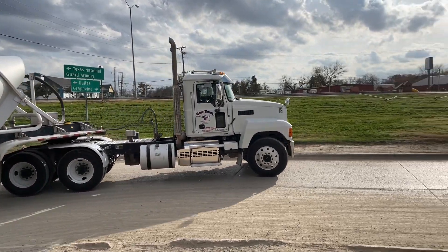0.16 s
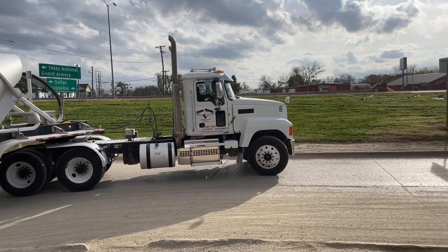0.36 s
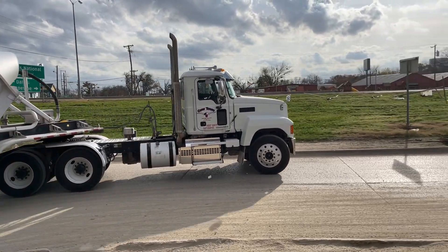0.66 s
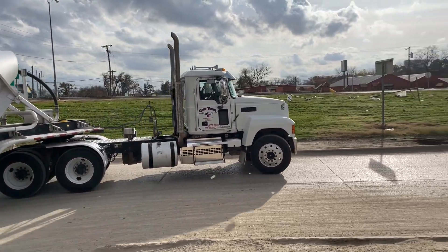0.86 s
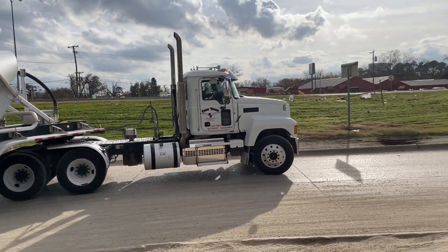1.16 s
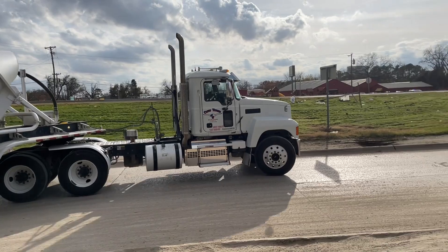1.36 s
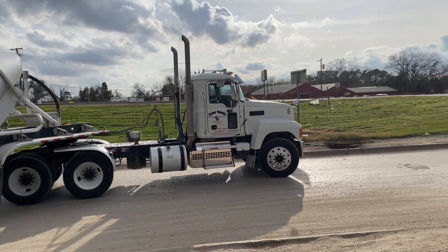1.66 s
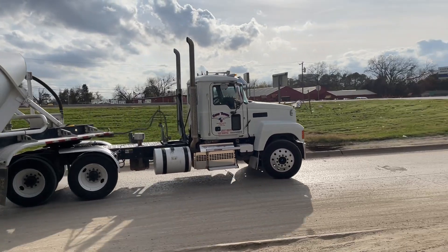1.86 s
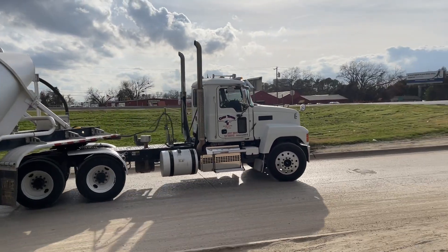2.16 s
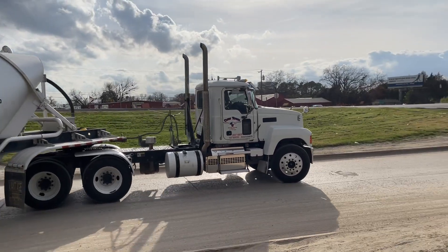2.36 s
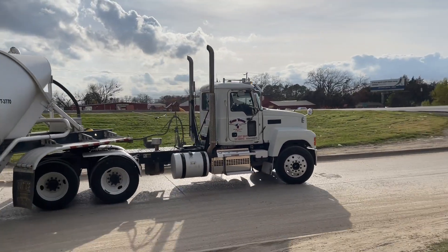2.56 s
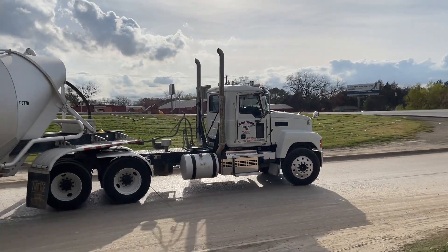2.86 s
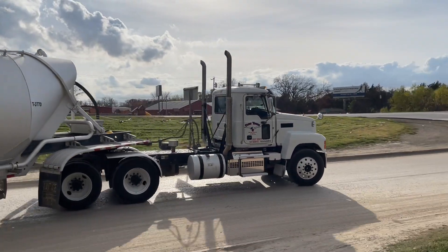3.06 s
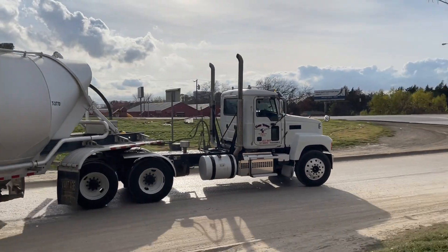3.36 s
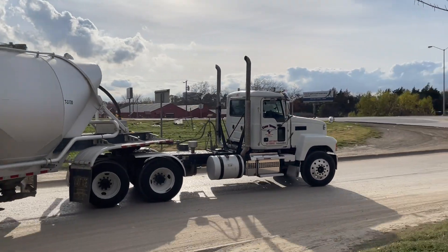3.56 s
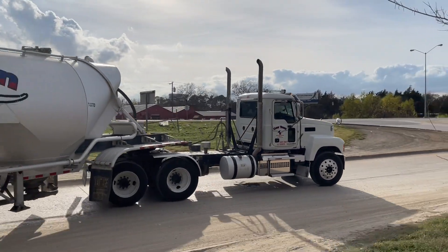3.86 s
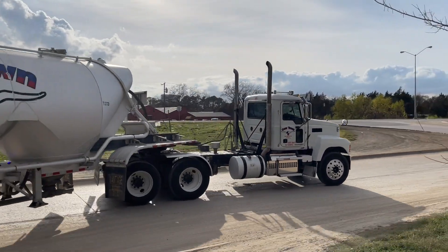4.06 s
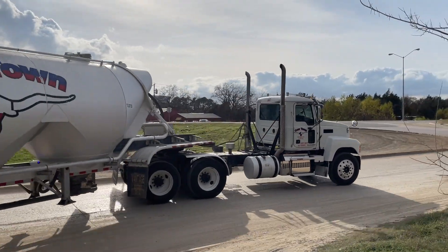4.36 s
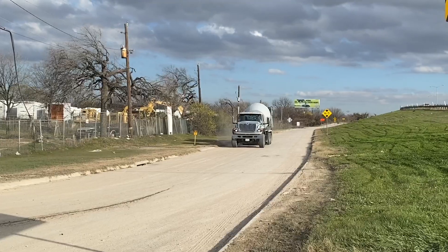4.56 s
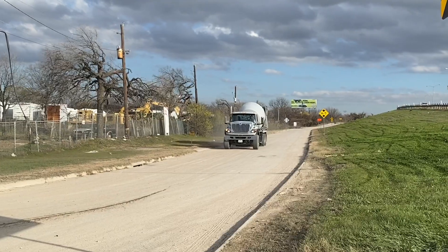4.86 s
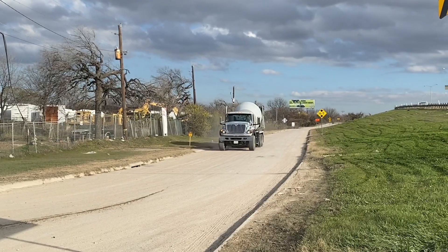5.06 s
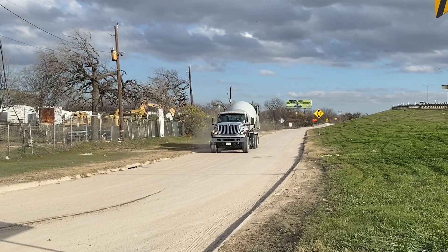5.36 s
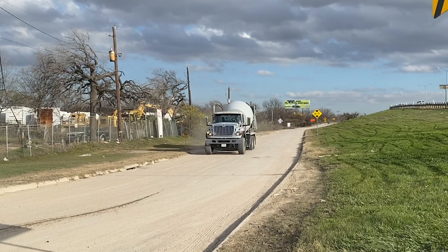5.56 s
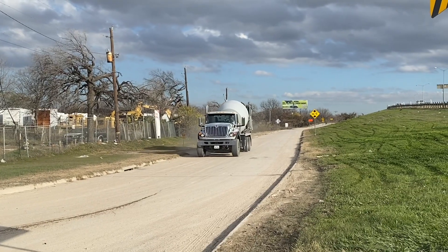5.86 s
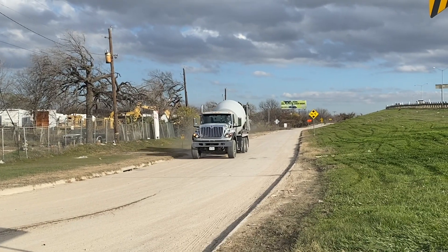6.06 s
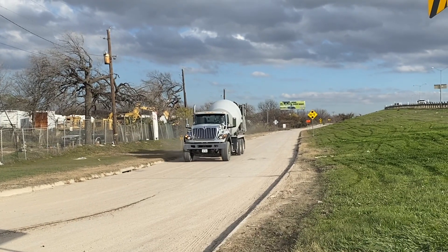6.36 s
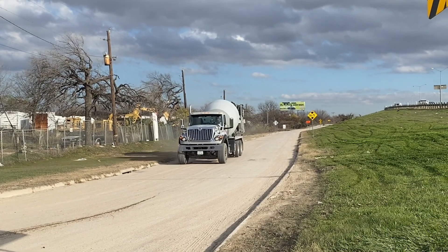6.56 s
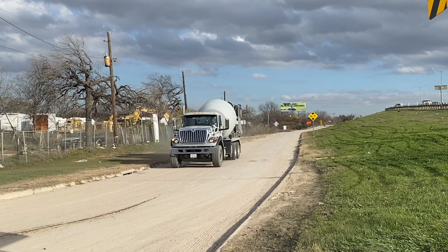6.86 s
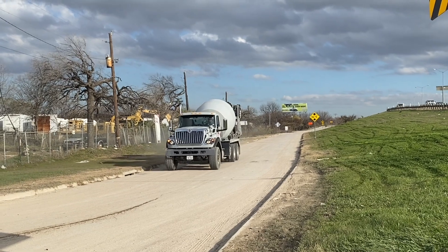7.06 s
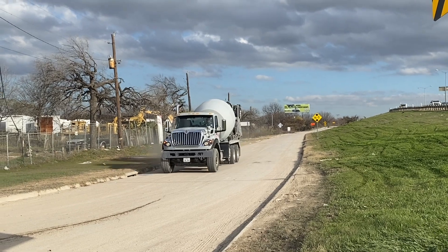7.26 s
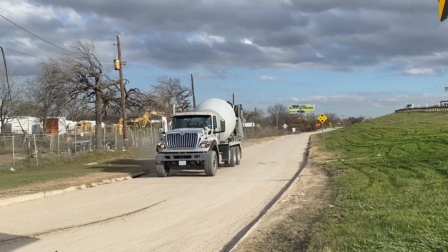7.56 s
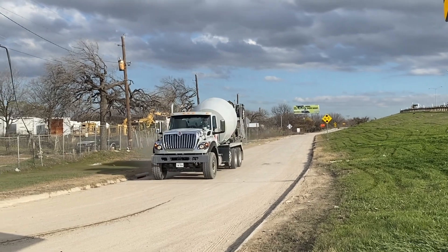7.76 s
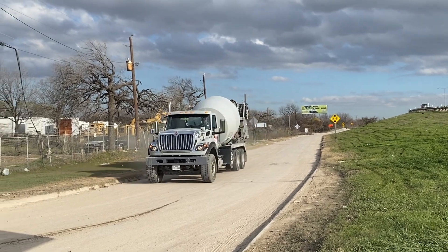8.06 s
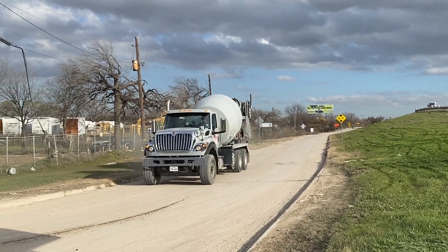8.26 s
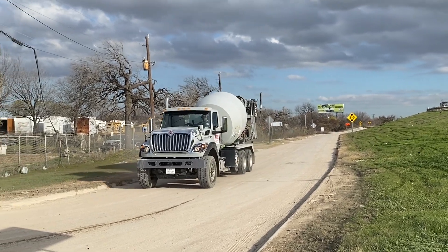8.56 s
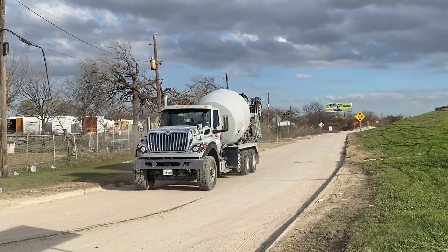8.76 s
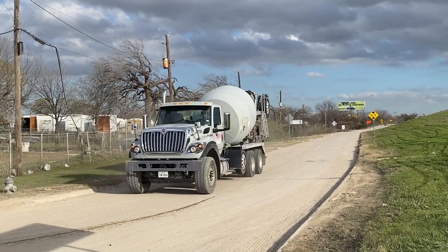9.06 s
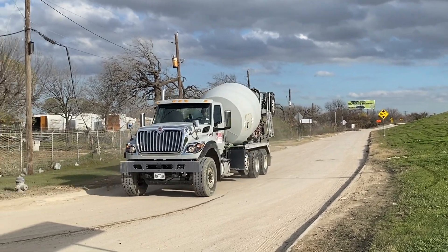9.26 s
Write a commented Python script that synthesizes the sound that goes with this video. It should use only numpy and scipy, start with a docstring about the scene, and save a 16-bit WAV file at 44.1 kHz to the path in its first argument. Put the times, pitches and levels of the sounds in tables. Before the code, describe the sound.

A heavy diesel truck rolls past close to a stereo microphone at low revs, with a throbbing exhaust, engine clatter, a brief air brake hiss and rapid squeaking. As it fades, its trailer coupling clanks twice and wind buffets the microphone. After a sudden dip, a second truck rumbles in from far down a quiet road and sounds two long air horn blasts with a faint echo.

```python
"""Two trucks and an air horn

A heavy diesel rolls past close to a stereo microphone, at low revs in gusty wind: exhaust tones on the
firing rate, block clatter, a squeaking shaft, a brake valve. After a short fade we stand by a quiet
road, where a second truck approaches from afar and sounds its air horn twice, a diaphragm beating into
a trumpet. At each blast the loudness of everything sinks in sudden steps; in between it creeps back."""
import sys
import numpy as np
from scipy import signal
from scipy.fft import rfft, irfft
from scipy.io import wavfile
from scipy.ndimage import uniform_filter1d, map_coordinates

SR = 44100
rng = np.random.default_rng(int(sys.argv[2]) if len(sys.argv) > 2 else 0)


def master_out(mix):
    """Clip the mix to full scale and print it as 16-bit PCM to the path in sys.argv[1]."""
    frames = np.transpose(np.atleast_2d(mix))
    ceiling = np.clip(frames, -1, 1)
    pcm = np.round(ceiling * 32767).astype(np.int16)
    wavfile.write(sys.argv[1], SR, pcm)


N = 414981

# The diesel, close by. Each row: time in seconds, firing rate in Hz, then firing tone, gear whine and
# relative body noise in dB.
NEAR_ENGINE = [(0.0, 52.5, -25.5, -42, 2), (0.61, 55.06, -25.5, -53, 0.5), (1.0, 53.2, -25.5, -44, -0.8),
               (1.4, 55.02, -25, -47, 1), (1.85, 53.52, -25.5, -43, 2), (2.4, 53.03, -26.5, -39.5, 0),
               (2.9, 52.54, -31.5, -44, -2.5), (3.63, 51.77, -30, -51, -4.5),
               (4.43, 51.6, -35.5, -45, -6.5)]
# Further exhaust tones. Each row: multiple of the firing rate, level in dB over the firing tone.
EXHAUST_TONES = [(2, -15), (3.5, -8), (4, -16), (5.5, -15), (8.5, -14), (11.5, -17), (13.5, -15), (15, -16),
                 (16, -16)]
# Rumble, block clatter, fan and tyre hiss. Each row: level in dB at the loudest, share of the fading.
NEAR_BANDS = [(-24.5, 0.08), (-19, 0.36), (-32.5, 0.73)]
# Colour of the body noise. Each row: frequency in Hz, relative level in dB.
NEAR_COLOUR = [(18, -35), (30, -17.5), (58, -11), (81, 7), (283, -8), (321, -14.5), (374, -13.5),
               (459, -16), (1060, -17), (1340, -19), (1770, -23), (5170, -24.5), (7980, -41.5),
               (10300, -31.5), (13300, -49.5)]
# Its stereo width. Each row: frequency in Hz, side over mid in dB.
NEAR_WIDTH = [(60, -29), (190, -15.5), (600, -11.5), (1250, -13.5), (1720, 0.5), (2200, -9), (3200, -4.5),
              (5000, -9.5), (6400, -1.5), (7800, 13), (10200, -13), (12800, 5.5)]
# Body resonances. Each row: centre in Hz, width in Hz, lift in dB.
NEAR_RESONANCES = [(637, 94, 3.5), (2140, 580, 5.5), (477, 24, 3.5), (1800, 66, -7.5), (1386, 81, 4.5),
                   (118, 30, -4.5), (4290, 260, 3.5), (5250, 400, 3.5)]
def near_truck(t, pipe_hz=328, pipe_width_hz=11.4, whine_multiple=46.7):
    """Close by: exhaust and gear tones ride on the firing rate, and the body noise throbs with it."""
    firing_hz, tone_db, whine_db, body_db = curves(NEAR_ENGINE, t)
    firings = np.cumsum(firing_hz) / SR
    # An exhaust resonance lifts the sixth multiple at higher revs.
    detuning = 2 * (6 * firing_hz - pipe_hz) / pipe_width_hz
    sixth_db = tone_db - 4 - 10 * np.log10(1 + detuning ** 2)
    orders = [(1, tone_db), (6, sixth_db), (whine_multiple, whine_db)]
    orders += [(k, tone_db + db) for k, db in EXHAUST_TONES]
    tones = sum(gain_of(db + .7 * wander(t, 8)) * np.sin(2 * np.pi * (k * firings + rng.random()))
                for k, db in orders)
    throb = 1 + .035 * np.cos(np.pi * firings) + .069 * np.cos(2 * np.pi * firings)
    body = roar(t, body_db, NEAR_BANDS, NEAR_COLOUR, NEAR_WIDTH, NEAR_RESONANCES,
                low_hz=380, high_hz=2340, patchy_db=.6, flicker_db=.49)
    return np.sqrt(2) * tones + throb * body


# Two blasts, a list each, valve opening to silence. Each row: time in seconds, air pressure in dB re full.
HORN_BLASTS = [
    [(6.667, -9.5), (6.69, -7), (6.87, -3.5), (7.02, -5.5), (7.16, -1), (7.4, 0), (7.56, -1.5), (7.78, -9),
     (7.9, -12.5), (7.98, -17), (8.07, -26)],
    [(8.639, -6.5), (8.68, -3.5), (8.83, 0), (9.01, -2.5), (9.17, 1), (9.39, -4), (9.6, -12.5)],
]
# Rattle of the horn mount. Each row: time in seconds, rate in Hz.
MOUNT_RATTLE = [(6.7, 72.4), (7.43, 70.4), (7.8, 65.5), (8.68, 58.1), (9.4, 57)]
def air_horn(blast, horn_hz=415.6, sharpen_hz_per_db=.36, buzz_hz=91):
    """Down the road, a diaphragm beats into a trumpet: 30 partials, a rattle on them, escaping air."""
    rows = HORN_BLASTS[blast]
    opens, silent = rows[0][0], rows[-1][0]
    t = np.arange(round(opens * SR), min(round(silent * SR), N)) / SR
    age = t - opens
    pressure_db = curves(rows, t)[0]
    # The pitch starts sharp, settles, and climbs as the pressure sags.
    hz = horn_hz + 14 * np.exp(-age / .005) - sharpen_hz_per_db * pressure_db
    cycles = np.cumsum(hz + .28 * wander(t, 40) + .3 * wander(t, 300)) / SR
    rattle = phase_of(curves(MOUNT_RATTLE, t)[0])
    out = np.zeros((2, len(t)))
    for n in range(1, 31):
        size = np.sqrt(2) * gain_of(partial_db(n, blast, t, age, pressure_db))
        depth = np.clip(.12 * (n - 5.5), .04, .42)  # high partials rattle most
        depth = depth * np.clip(.7 + .25 * wander(t, 6), 0, 1.2)
        shake = np.cos(rattle + 2 * np.pi * rng.random()) + (n > 10) * .36 * np.cos(2 * rattle)
        size *= 1 + depth * shake
        if 3 <= n <= 5:  # a second, fainter rattle
            size += gain_of(pressure_db - 40) * np.cos(2 * np.pi * buzz_hz * t)
        angle = 2 * np.pi * n * cycles - .04 * n ** 2 + depth / 2 * np.sin(rattle) + .2 * wander(t, 3)
        out += size * horn_at_ports(n, horn_hz * n, angle)
    out += escaping_air(pressure_db, cycles)
    valve = np.clip(np.minimum(age / .0058, (silent - t) / .022), 0, 1)
    whole = np.zeros((2, N))
    whole[:, round(opens * SR):][:, :len(t)] = out * valve
    return whole


# The horn's timbre. Each row: partial number, dB per dB of pressure, then for each blast the level at
# full pressure in dB, drift in dB per second and bend in dB per second squared.
HORN_PARTIALS = [(1, 0.33, -14, -5.5, 0, -13.5, 3.5, -14), (2, 1.13, -8.5, 4, -2, -5.5, 4.5, -6),
                 (3, 0.87, -7, -0.6, 0.3, -6.5, -2.5, -1), (4, 1.46, -10, -14, 6.5, -21.5, -2, 9),
                 (5, 0.25, -26, -7, 6, -22.5, 1, -8), (6, 0.59, -19, 2, -2.5, -18, -19, 4),
                 (7, 0.43, -28, -12, 15.5, -19, -4, -18), (8, 1.07, -28.5, 9, -3.5, -23.5, -14.5, 19),
                 (9, 0.21, -25, -10, 3, -31.5, 5, 4), (10, 0.15, -26.5, 4.5, -10, -26.5, 8, -15),
                 (11, 0.75, -28, -2, 3, -27.5, -2, -5), (12, -0.83, -38.3, -4, -4, -38.5, -3, 8.4),
                 (13, 1.1, -35, -2.5, 3, -41, 4, -1.1), (14, 0.55, -35.5, -14, 13, -35.1, 4, -8.0),
                 (15, 1, -43, 2, 5, -39, 3.4, 3.5), (16, 0.58, -36.5, 14, -23, -41, 2, -5),
                 (17, -0.091, -33, -8, -8, -44, 5, -10.0), (18, 0.14, -34, -10.5, 3, -35.5, -12.6, 9),
                 (19, 0.13, -38.5, -5, 0, -38, -3.4, -1.6), (20, 0.32, -54.5, 4.5, 7.5, -46.6, 5.0, -4.3),
                 (22, 0.8, -48, 4, -3, -47, 2, -4), (24, 0.18, -43.5, -11, 7, -47, 3, -0.0),
                 (30, 0.75, -61, -4, 0, -65, 2, 0)]
# Single partials drop out and return. Each row: partial number, time in seconds, dip in dB,
# half-length in seconds.
PARTIAL_DIPS = [(7, 6.99, -9, 0.084), (4, 7.04, -6, 0.027), (5, 7.0, -7, 0.031), (6, 9.09, -7, 0.055),
                (12, 7.17, -5, .08), (5, 7.62, -14, 0.084), (12, 8.88, -5, .06), (4, 8.95, -6, 0.1),
                (8, 9.06, -9, 0.097), (7, 9.32, -10, 0.046)]
# The second partial's lift at the onset, in dB for each blast; its neighbours move the other way.
ONSET_DB = [7, -1]
COLLAPSE_DB = -10  # under this pressure the partials die, the highest first
def partial_db(n, blast, t, age, pressure_db):
    """The level of one horn partial follows the air pressure, drifts and wavers."""
    numbers, *columns = np.transpose(HORN_PARTIALS)
    columns = [columns[0]] + columns[1 + 3 * blast:4 + 3 * blast]
    follow, full_db, drift, bend = (np.interp(n, np.rint(numbers), c) for c in columns)
    db = full_db + follow * pressure_db + (drift + bend * age) * age
    db += .48 * n * np.minimum(pressure_db - COLLAPSE_DB, 0)
    db += ONSET_DB[blast] * {1: -1, 2: 1, 3: -2, 4: -2}.get(n, 0) * np.exp(-(age / .012) ** 4)
    db += .5 * wander(t, 40) if n < 4 else 1.4 * wander(t, 7)
    return db + sum(dip * bump(t - s, length) for k, s, dip, length in PARTIAL_DIPS if round(k) == n)


# The horn's balance, left over right in dB, for partials 1 to 4 and then all the rest.
HORN_BALANCE_DB = [-0.8, 1, -1.5, -7.5, .7]
# The horn's bearing. Each row: frequency in Hz, lead of the left port in radians.
HORN_LEAD = [(400, 0.08), (2000, 0.25), (3000, 0.6), (4600, 0.55), (5800, 0.5), (7000, 2), (8500, 1.5),
             (10000, 1), (11200, 1), (12100, 2), (12600, -5)]
def horn_at_ports(n, hz, angle):
    """A partial reaches the two microphone ports at different levels and phases."""
    lean = gain_of(HORN_BALANCE_DB[min(n, len(HORN_BALANCE_DB)) - 1])
    lead = np.tan(np.clip(at_hz(HORN_LEAD, hz), -2.3, 2.3) / 2)
    side = (lean - 1) / (lean + 1) * np.cos(angle) - lead * np.sin(angle)
    return np.cos(angle) + np.array([side, -side])


# Colour of the horn's air. Each row: frequency in Hz, relative level in dB.
AIR_COLOUR = [(300, -20), (900, -2), (1500, -14), (3000, -7), (5000, -5), (7000, -5), (8500, -11),
              (11000, -18), (13000, -34)]
def escaping_air(pressure_db, cycles):
    """Air hisses out of the horn, pulsing with each cycle of the diaphragm."""
    noise = rng.standard_normal((3, len(cycles)))
    hiss = unit_rms(coloured(noise[0] + .5 * noise[1:], AIR_COLOUR))
    db = -37 + .5 * pressure_db + 2 * np.minimum(pressure_db - COLLAPSE_DB, 0)
    return hiss * gain_of(db) * (1 + .5 * np.cos(2 * np.pi * cycles))


# Returns from banks and sheds. Each row: frequency in Hz, level in dB relative to the horn.
ECHO_COLOUR = [(400, -17), (830, -18.5), (1250, -15.5), (1660, -11.5), (2080, -8), (2500, -14),
               (2900, -12.5), (4000, -9.5), (6000, -10), (9000, -10)]
# Walls the truck leaves behind return the tone flatter by these shares of its pitch.
WALL_FLATTENING = [.001, .008, .017, .024]
def echoes(horn, opens, t60=.77):
    """Faint returns of one blast from along the road, each wall with its own drop in pitch."""
    t, samples, out = np.arange(SR // 2) / SR, np.arange(N), np.zeros((2, N))
    mono = coloured(horn.mean(0), ECHO_COLOUR)
    for share in WALL_FLATTENING:
        taps = rng.standard_normal((2, len(t))) * (rng.random((2, len(t))) < .05)
        taps *= gain_of(-60 * t / t60) * (t > .03)
        slowed = map_coordinates(mono, [samples - share * (samples - opens * SR)], order=3)
        out += signal.fftconvolve(slowed[None], taps / np.linalg.norm(taps[0]), axes=1)[:, :N]
    return out / np.sqrt(len(WALL_FLATTENING))


# The second truck, far down the road. Each row: time in seconds, relative level in dB.
FAR_LEVEL = [(4.48, -2), (5.1, -1.5), (5.7, 0), (6.6, 1), (7.3, 0), (8.1, -2.5), (8.6, -0.5), (9.41, -7)]
# Rumble, tyre roar, hiss. Each row: level in dB at the loudest, share of the fading.
FAR_BANDS = [(-25, 0.65), (-30, 1.04), (-43.5, 1.47)]
# Its colour from afar. Each row: frequency in Hz, relative level in dB.
FAR_COLOUR = [(18, -41), (30, -15.5), (97, -4.5), (243, -14.5), (415, -16.5), (640, -14), (825, -15),
              (1090, -16), (1240, -19), (1520, -20), (7780, -44), (10300, -53), (13300, -81)]
# Its stereo width. Each row: frequency in Hz, side over mid in dB.
FAR_WIDTH = [(60, -29), (130, -12.5), (280, -14.5), (600, -9.5), (1290, -5), (2770, -10.5), (5970, -10.5),
             (12800, 5)]
# Body resonances. Each row: centre in Hz, width in Hz, lift in dB.
FAR_RESONANCES = [(97, 45, 3), (625, 70, 4.5), (705, 70, 4)]
def far_truck(t):
    """Rumble and tyre roar carry up the quiet road."""
    return roar(t, curves(FAR_LEVEL, t)[0], FAR_BANDS, FAR_COLOUR, FAR_WIDTH, FAR_RESONANCES,
                low_hz=300, high_hz=2500, patchy_db=1.1, flicker_db=.5)


# Balance of both trucks' noise at the microphone. Each row: frequency in Hz, left over right in dB.
MIC_BALANCE = [(60, -4), (230, -0.5), (880, 0), (3360, 2), (12800, -1)]
def roar(t, level_db, bands, colour, width, resonances, low_hz, high_hz, patchy_db, flicker_db):
    """Noise in a truck's body resonances; three bands follow one level, and patches drift through."""
    frames, hz = N // 256 + 5, np.fft.rfftfreq(1024, 1 / SR)
    frame_t = np.arange(frames) * 256 / SR
    mid_re, mid_im, side_re, side_im, patches = rng.standard_normal((frames, 513, 5)).T
    patches = unit_rms(uniform_filter1d(uniform_filter1d(patches, size=8, axis=0), size=12, axis=1))
    resonance_db = sum(db / (1 + (2 * (hz - f) / w) ** 2) for f, w, db in resonances)
    shape = gain_of(at_hz(colour, hz) + resonance_db)
    low, high = 1 / (1 + (hz / low_hz) ** 4), 1 / (1 + (high_hz / (hz + 1)) ** 4)
    regions = [shape * r for r in (low, np.clip(1 - low - high, 0, 1), high)]
    fading_db = np.interp(frame_t, t, level_db - level_db.max())
    field = sum(np.outer(r / np.linalg.norm(r), gain_of(db + share * fading_db))
                for r, (db, share) in zip(regions, bands))
    field *= gain_of(patchy_db * patches + flicker_db * wander(frame_t, 30))
    mid = mid_re + 1j * mid_im
    side = (side_re + 1j * side_im) * gain_of(at_hz(width, hz))[:, None]
    lean = gain_of(at_hz(MIC_BALANCE, hz) / 2)[:, None]
    stereo = field * np.array([(mid + side) * lean, (mid - side) / lean])
    return signal.istft(stereo, nperseg=1024, noverlap=768)[1][:, :N] / np.sqrt(2)


# A shaft on the near truck. Each row: time in seconds, turns so far, squeak pitch in Hz, level in dB.
SHAFT = [(.6, 5.6, 1335, -38), (1.1, 10.65, 1335, -30), (1.3, 12.69, 1335, -25), (1.5, 14.78, 1325, -28),
         (1.8, 17.81, 1300, -27), (2.35, 23.44, 1300, -26), (2.5, 24.99, 1372, -28),
         (3.3, 33.01, 1378, -29), (3.6, 35.95, 1378, -30), (4.2, 41.7, 1370, -35)]
def shaft_squeak(t, glide_hz_per_turn=60, chatter_lag_turns=.35):
    """A rising squeak once a turn, then a weaker one of changing size."""
    turns, hz, db = curves(SHAFT, t)
    offset = turns - np.rint(turns)
    chatter = .9 * np.clip(.5 + .5 * wander(t, 5.9), 0, 1) * bump(offset - chatter_lag_turns, .08)
    envelope = (.38 + bump(offset, .08) + chatter) * (t > SHAFT[0][0]) * (t < SHAFT[-1][0])
    pitch = hz + glide_hz_per_turn * offset + 40 * wander(t, 300)
    return envelope * gain_of(db + 2.1 * wander(t, 80)) * tone(pitch)


# The ring of a knock. Each row: frequency in Hz, level in dB, seconds to fall 60 dB.
KNOCK_RING = [(850, 0, .05), (915, -2, .04), (790, -4, .04)]
def shaft_knocks(t, loudest_s=3.0, spread_s=.45):
    """Dull knocks, twice a shaft turn, swell and fade as the near truck passes."""
    turns = curves(SHAFT, t)[0]
    strikes = np.diff(np.floor(2 * turns + .6), prepend=0) == 1
    db = -19 - 9 * ((t - loudest_s) / spread_s) ** 2 + 2 * rng.standard_normal(N)
    return struck(strikes * gain_of(db), KNOCK_RING, rise_s=.002)


# Blows and bounces of the trailer coupling. Each row: start in seconds, peak in dB.
COUPLING_BLOWS = [(4.169, -22), (4.177, -28), (4.184, -26), (4.281, -19.5), (4.286, -26)]
# The coupling's ring. Each row: frequency in Hz, level in dB, seconds to fall 60 dB.
COUPLING_RING = [(3300, 2, .018), (2988, -3, .02), (3700, -3, .012), (4500, -5, .01), (5760, -5, .012),
                 (6460, -9, .01)]
def coupling_clanks():
    """Close by, the trailer coupling strikes twice and bounces."""
    blows = np.zeros(N)
    for start, db in COUPLING_BLOWS:
        blows[round(start * SR)] = gain_of(db)
    return struck(blows, COUPLING_RING, rise_s=.0003)


def brake_vent(t, opens_s=.4, shuts_s=.85, db=-35.5):
    """A brake valve on the near truck lets off air in a swelling hiss and shuts at once."""
    swell = np.clip(np.minimum((t - opens_s) / (shuts_s - opens_s), (shuts_s - t) / .01), 0, 1)
    return gain_of(db) * np.sqrt(swell) * band_noise(2500, 3600, N)


# Whistles at both places. Each row: start and length in seconds, pitch in Hz, glide in Hz per second,
# level in dB, waver in Hz.
THIN_WHISTLES = [(.45, .36, 2640, -40, -41, 13), (4.86, .57, 3280, 260, -49, 45),
                 (5.215, .03, 4950, 300, -56, 60), (2.05, 1.9, 716, -14, -39, 1),
                 (2.5, 1.2, 1268, -14, -42, 2), (3.2, .9, 632, -22, -41, 2), (5.3, 1.35, 624, -8, -46, 2)]
def whistles(t):
    """Thin wavering tones from brakes, bearings or gears."""
    out = np.zeros(N)
    for start, length, hz, glide, db, waver_hz in THIN_WHISTLES:
        envelope = np.clip(np.minimum(t - start, start + length - t) / (.25 * length), 0, 1)
        pitch = hz + glide * np.clip(t - start, 0, length) + waver_hz * wander(t, 250)
        out += envelope * gain_of(db + 2.5 * wander(t, 120)) * tone(pitch)
    return out


# The far truck's whine. Each row: time in seconds, level in dB, depth of the throb from 0 to 1.
DISTANT_WHINE = [(4.5, -54, .3), (4.9, -45, .4), (5.4, -44, .3), (5.65, -39, .9), (5.86, -40, .9),
                 (5.95, -45, .3), (6.2, -43, .3), (6.4, -54, .3)]
def distant_whine(t, hz=645, throb_hz=10.7, crest_s=5.655):
    """A distant whine throbbing about eleven times a second, like two close tones beating."""
    db, depth = curves(DISTANT_WHINE, t)
    throb = 1 + depth * np.cos(2 * np.pi * throb_hz * (t - crest_s))
    return throb * gain_of(db + wander(t, 20)) * tone(hz + 2 * wander(t, 30))


# Wind on the microphone. Each row: peak time in seconds, level in dB, centre in Hz, length in seconds.
WIND_BUFFETS = [(2.3, -29.5, 150.6, 0.5), (2.39, -22.5, 224.8, 0.039), (3.95, -24.5, 115, 0.23),
                (4.12, -18, 203.7, 0.028), (4.15, -25, 175.4, 0.54), (4.19, -22, 790, 0.052),
                (4.22, -18, 113, 0.085), (4.33, -22, 250, 0.047), (4.4, -21.5, 205, 0.049)]
def wind(t, puff_count=9, until_s=4.43):
    """At the first place, buffets hit both ports; small puffs push one port and pull the other."""
    small = [(when * until_s, -28 + 2 * (size - .5), 900 * (.66 + .66 * pitch), .024)
             for when, size, pitch in rng.random((puff_count, 3))]
    puffs = turbulence(small, t, edge_ratio=1.37) * np.array([[1], [-1]])
    return puffs + turbulence(WIND_BUFFETS, t, edge_ratio=1.6) * np.array([[1.1], [.9]])


def turbulence(rows, t, edge_ratio):
    """Short lumps of moving air, each a noise band under a soft bump."""
    out = np.zeros(N)
    for s, db, hz, length in rows:
        span = slice(max(round(s * SR) - SR // 2, 0), round(s * SR) + SR // 2)
        lump = band_noise(hz / edge_ratio, hz * edge_ratio, SR)[:len(t[span])]
        out[span] += gain_of(db) * lump * bump(t[span] - s, length / 2)
    return out


def struck(blows, modes, rise_s):
    """A train of blows rings a set of decaying modes."""
    t = np.arange(SR // 8) / SR
    ring = sum(gain_of(db - 60 * t / t60) * np.sin(2 * np.pi * hz * t) for hz, db, t60 in modes)
    ring *= 1 - np.exp(-t / rise_s)
    return signal.oaconvolve(blows, ring / abs(ring).max())[:N]


def band_noise(low_hz, high_hz, count):
    """A band of noise at rms 1."""
    band = signal.butter(2, [low_hz, high_hz], "band", fs=SR, output="sos")
    return unit_rms(signal.sosfilt(band, rng.standard_normal(count)))


def coloured(x, colour):
    """Filters by a table of Hz and dB."""
    count = x.shape[-1]
    return irfft(rfft(x) * gain_of(at_hz(colour, np.fft.rfftfreq(count, 1 / SR))), count)


def wander(t, top_hz):
    """Random drift of rms 1 in the decade under top_hz."""
    rates = np.geomspace(top_hz / 10, top_hz, 10)
    return unit_rms(sum(np.sin(2 * np.pi * (hz * t + rng.random())) / np.sqrt(hz) for hz in rates))


def tone(hz):
    """A sine of rms 1 on a moving pitch."""
    return np.sqrt(2) * np.sin(phase_of(hz))


def phase_of(hz):
    """Running phase in radians."""
    return 2 * np.pi * np.cumsum(hz) / SR


def bump(x, half_width):
    """A bell curve of height 1."""
    return np.exp(-(x / half_width) ** 2)


def curves(rows, t):
    """Every column of a table along time."""
    times, *columns = np.transpose(rows)
    return [np.interp(t, times, c) for c in columns]


def at_hz(rows, hz):
    """Reads a spectrum table on a log-frequency axis."""
    f, value = np.transpose(rows)
    return np.interp(np.log(hz + 1), np.log(f + 1), value)


def unit_rms(x):
    """Scales to rms 1."""
    return x / np.sqrt(np.mean(x ** 2) + 1e-20)


def gain_of(db):
    """Decibels to gain."""
    return 10 ** (np.asarray(db) / 20)


# The fade between the two places. Each row: time in seconds, gain.
PLACE_FADE = [(4.43, 1), (4.463, 0.0087), (4.47, 0.28), (4.51, 1)]
def scene():
    """Beside the first truck, a dip almost to silence, then the quiet road with the second far off."""
    t = np.arange(N) / SR
    near = near_truck(t) + shaft_squeak(t) + shaft_knocks(t) + coupling_clanks() + brake_vent(t)
    horns = [air_horn(blast=0), air_horn(blast=1)]
    far = far_truck(t) + distant_whine(t)
    far += sum(horn + echoes(horn, opens=rows[0][0]) for horn, rows in zip(horns, HORN_BLASTS))
    trucks = np.where(t < PLACE_FADE[1][0], near, far)
    return (trucks + whistles(t) + wind(t)) * curves(PLACE_FADE, t)[0]


# Sudden drops in loudness during the blasts. Each row: start in seconds, step in dB.
LOUDNESS_STEPS = [(6.686, -2.5), (6.717, -2.5), (6.777, -3), (7.148, -3), (8.731, -3), (8.841, -2.5)]
def record(dry, step_s=.003, creep_from_s=8.17, creep_s=.68, creep_db=4, top_hz=13440):
    """Small microphones lose the deepest bass; the level steps down and creeps back; the top is cut."""
    t = np.arange(N) / SR
    level_db = sum(db * np.clip((t - s) / step_s, 0, 1) for s, db in LOUDNESS_STEPS)
    level_db += creep_db * np.clip((t - creep_from_s) / creep_s, 0, 1)
    thinned = signal.sosfilt(signal.butter(4, 38, "high", fs=SR, output="sos"), dry)
    lowpass = signal.firwin(511, top_hz, window=("kaiser", 9), fs=SR)
    return signal.oaconvolve(thinned * gain_of(level_db), lowpass[None], "same")


dry = scene()
out = record(dry)
master_out(out)
```